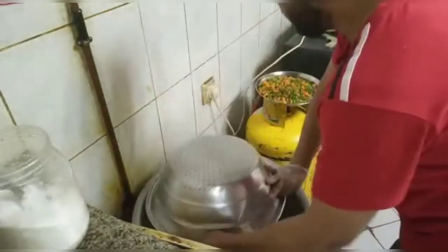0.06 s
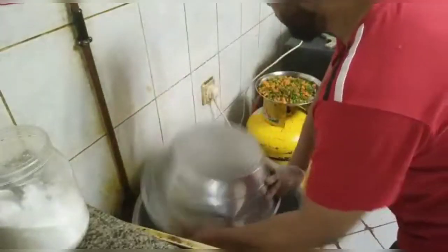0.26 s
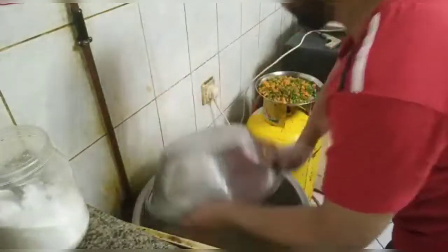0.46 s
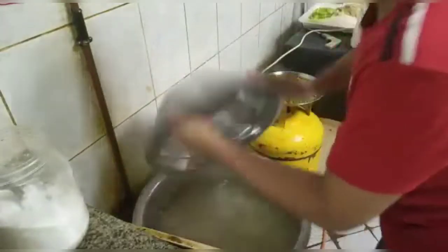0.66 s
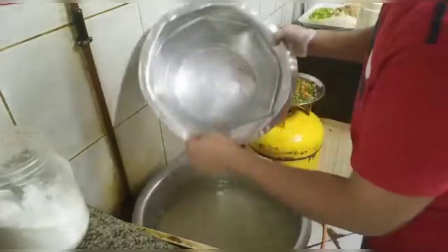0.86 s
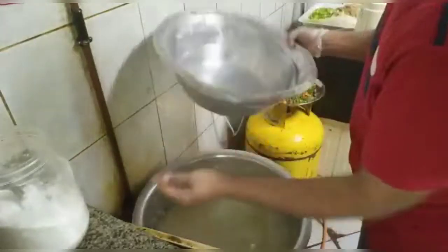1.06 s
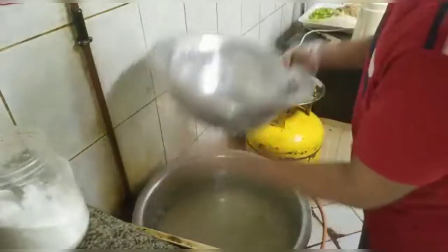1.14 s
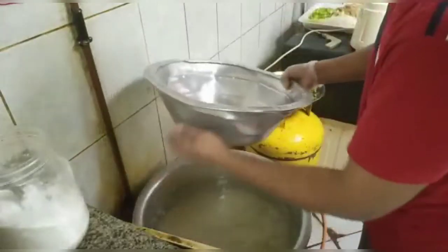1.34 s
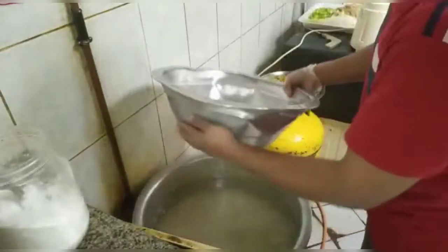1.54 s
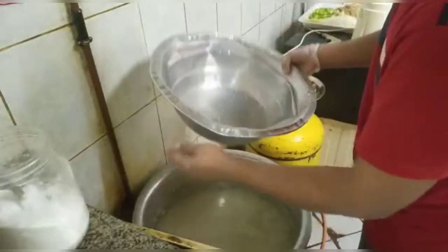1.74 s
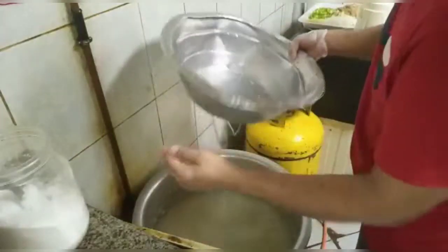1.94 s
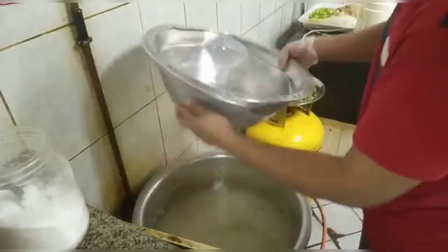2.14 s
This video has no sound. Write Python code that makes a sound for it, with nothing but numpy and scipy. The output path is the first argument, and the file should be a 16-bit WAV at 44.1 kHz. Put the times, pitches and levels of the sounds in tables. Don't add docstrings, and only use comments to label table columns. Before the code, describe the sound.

A thin metal strainer rings out from an earlier blow while grains hiss and fade, with a faint tick near 0.1 s. It clangs on a large pot rim at 0.3 and 0.6 s, then hand slaps ring its side at 1.5 and base at 1.85 s, grains sliding after each. A faint knock follows at 2.05. Low extractor hum and air dip after blows; small tiled kitchen, compressed phone sound.

```python
import sys
import numpy as np
from scipy import signal
from scipy.fft import rfft, irfft
from scipy.io import wavfile
from scipy.ndimage import uniform_filter1d

SR = 44100
rng = np.random.default_rng(int(sys.argv[2]) if len(sys.argv) > 2 else 0)


def dump(signal):
    limited = np.clip(np.atleast_2d(signal).T, -1, 1)
    pcm = np.round(limited * 32767).astype(np.int16)
    wavfile.write(sys.argv[1], SR, pcm)


def voltage_ratio(decibels):
    exponent = np.asarray(decibels, float) / 20
    return 10 ** exponent


N = 99225
TIME = np.arange(N) / SR
BINS_HZ = np.arange(N + 1) * SR / (2 * N)
LEFT_RIGHT = np.array([[1], [-1]])

# (frequency [Hz], level [dB])
MOTOR_LINES = [(96.9, -37), (193.8, -52.5), (290.7, -54.5), (387.6, -56), (1066, -50.5), (1755, -55.5),
               (1922, -63)]
# (frequency [Hz], level [dB per Hz])
AIR_COLOUR = [(25, -23.5), (95, 1), (140, -7), (300, -13.5), (650, -16.5), (1100, -13), (3000, -18),
              (13000, -30)]
# (time [s], level [dB])
BACKGROUND_GAIN = [(0, 13), (.07, 9), (.12, 10.5), (.21, 13.5), (.3, 13), (.55, 3.5), (.85, -2), (.97, 1.5),
                   (1.02, 0), (1.15, 1.5), (1.25, 2.5), (1.36, 2.5), (1.42, 1), (1.5, -0.5), (1.8, 1.5),
                   (2.1, 4.5), (2.19, 7), (2.25, 3.5)]
# (frequency [Hz], likeness [-1 to 1])
EAR_LIKENESS = [(40, 1), (300, 0.76), (600, .3), (1500, -0.23), (6000, -0.092), (13000, 0.14)]

# (start [s], peak [s], fade by 60 dB [s], level [dB])
GRAIN_SLIDES = [
    (-.05, 0.008, 0.6, -27),
    (1.632, 1.767, 0.9, -27.5),
    (1.934, 2.089, 0.25, -27),
]
# (frequency [Hz], level [dB per Hz])
GRAIN_COLOUR = [(500, -45), (1200, -1), (3000, -7), (6500, 2), (9000, -3.5), (13000, 1.5)]

# (time [s], strength [dB], body [0 pot rim, 1 hand on side, 2 hand on base; whole part counts],
# decay scale [times], brightness [dB per octave])
STRIKES = [
    (-.12, -21, 2, 1.75, 0.45),
    (0.2843, -4.5, 0, 0.97, -1.22),
    (0.6134, -5, 0.39, .95, 0.15),
    (1.5327, -3, 1.007, 0.93, -0.028),
    (1.8394, -3.5, 2, 0.9, -0.026),
]
# (time [s], level [dB], which modes [index])
SMALL_KNOCKS = [
    (.077, -36, 0),
    (2.055, -39, 1),
]
# (frequency [Hz], level [dB], decay by 60 dB [s])
KNOCK_MODES = [
    [(615, 8, 0.051), (1760, 5, 0.029), (2650, -5, .04), (3120, 2.5, 0.034), (4950, -6, .03)],
    [(1290, 1.5, 0.41), (2010, 0, 0.26), (580, -10, 0.36)],
]

# (frequency [Hz], level [dB], decay by 60 dB [s])
POT_RIM_MODES = [(78.2, -8, 0.77), (137.7, -15, .25), (160, -17, .25), (211, 3, 0.14), (265.9, 0, 0.19),
                 (277, -3, 0.19), (286, -4, 0.25), (337, -12, 0.15), (446, -21, 0.52), (733, -7, 0.43),
                 (1135, -5, 0.31), (1180.2, -4, 0.3), (1673, -16, 0.22), (1970, -21, 0.76)]
# (frequency [Hz], level [dB], decay by 60 dB [s])
SIDE_SLAP_MODES = [(77.5, -3.5, 0.61), (110.8, -12, 0.35), (269, -14, 0.46), (489.5, -12, 0.23),
                   (600.6, -7, 0.36), (626, -10, 0.45), (963, -12, 0.26), (1106, -6, .24), (1953, -10, 0.4),
                   (2152, -4, .3), (2580, -11, 0.55), (2773, -5, .36), (2950, -5, 0.36), (3270, -3, 0.27)]
# (frequency [Hz], level [dB], decay by 60 dB [s])
BASE_SLAP_MODES = [(78.5, -4, 0.9), (100.2, 1, 0.25), (133.7, -1.5, 0.14), (157, -4, 0.2), (447, -5, 0.5),
                   (511, -8, 0.55), (582, -6, 0.45), (274, -12, 0.35), (857, -8, 0.2), (1226, -6.5, 0.097),
                   (1954, -18, 0.65), (2303, -7.5, 0.2), (2767, -23, 0.15), (6019, -16, .12)]
# (frequency [Hz], level [dB], decay by 60 dB [s])
CONTACT_THUD = [(330, -5, 0.041), (642, -3, .03), (121, -3, 0.05), (80, -9, .12), (185, -3, .06)]

# (frequency [Hz], level [dB per Hz])
POT_RIM_CLANG = [(40, -30), (110, -18), (260, -9), (500, -18), (1170, -13), (1600, -17), (6000, -25),
                 (13000, -32)]
# (frequency [Hz], level [dB per Hz])
SIDE_SLAP_CLANG = [(40, -17), (90, -10), (200, -19), (600, -7), (1300, -8), (2800, -4), (4200, -16),
                   (13000, -22)]
# (frequency [Hz], level [dB per Hz])
BASE_SLAP_CLANG = [(40, -25), (140, -8), (280, -12), (520, -5), (1200, -8), (3500, -11.5), (6200, -11.5),
                   (13000, -21.5)]
# (frequency [Hz], decay by 60 dB [s])
CLANG_DECAY = [(100, 0.44), (400, 0.52), (1500, 0.54), (4000, 0.46), (8000, 0.46), (13000, 0.39)]
# (frequency [Hz], width [Hz], level [dB])
MODE_CROWDS = [(505, 30, 4), (615, 35, 5), (735, 25, 4), (860, 20, 5), (1110, 30, 5), (1180, 50, 5),
               (1670, 40, 5), (1980, 25, 7), (2150, 40, 6), (2320, 60, 5), (2580, 40, 4), (2760, 40, 5),
               (2940, 25, 5), (3190, 30, 6)]
# (frequency [Hz], width [Hz], level [dB])
MODE_GAPS = [(400, 20, -3), (545, 20, -4), (680, 25, -8), (920, 30, -3), (1020, 30, -5), (1520, 90, -7),
             (1770, 40, -6), (2480, 40, -4), (3400, 80, -8), (4000, 60, -4)]

# (frequency [Hz], level [dB], decay by 60 dB [s])
RIM_PARTIALS_1 = [(630, -5, 0.45), (791, -2, 0.41), (1130, 0, 0.41), (1986, -44, 5.0), (2708, -12, 0.61),
                  (3628, -16, 0.53), (4086, -22, 1.7), (4608, -15, 0.38), (5033, -18, 0.37),
                  (5679, -16, 0.46)]
# (frequency [Hz], level [dB], decay by 60 dB [s])
RIM_PARTIALS_2 = [(727, 0, 0.17), (1184, -8, 0.28), (1620, -15, 0.56), (2116, -18, 1.0), (4000, -24, 0.77),
                  (4721, -14, 0.25), (4931, -17, 0.37), (5206, -10, 0.18), (5539, -29, 1.3),
                  (5852, -26, 5.0)]
# (frequency [Hz], level [dB], decay by 60 dB [s])
SIDE_PARTIALS = [(1109, 0, 0.19), (1981, -5, 0.22), (2557, -13, 0.21), (2762, -13, 0.85), (2939, -19, 5.0),
                 (3182, -10, 0.36), (3688, -25, 1.1), (3941, -14, 0.25), (4570, -19, 0.3),
                 (6277, -20, 0.37)]
# (frequency [Hz], level [dB], decay by 60 dB [s])
BASE_PARTIALS = [(856, -5, 0.44), (1190, 0, 0.19), (1976, -7, 0.36), (2309, -5, 0.3), (3521, -6, 0.12),
                 (4215, -9, 0.19), (4592, -22, 1.5), (4915, -18, 0.6), (5766, -25, 2.7), (6019, -5, 0.15)]

BODY_MODES_DB = [-9.5, -10, -9]
BODY_THUD_DB = [-4, -9, -9]
BODY_CLANG_DB = [-2, -2, -2.5]
BODY_CRACK_DB = [7, 5, 5]
BODY_SWELL_S = [0.036, 0.0064, 0.0039]
BODY_HOLD_S = [0.06, 0.016, 0.013]
BODY_CLANG_HOLD_S = [0.033, 0.011, 0.0069]
BLOW_PARTIALS_DB = [-23, -19, -19, -21]
BLOW_TOP_OPEN_S = [0, .009, .032, .04, .022]


def rms_one(x):
    return x / np.sqrt(np.mean(x ** 2) + 1e-20)


def at_hz(points, hz):
    table = np.array(points)
    return np.interp(np.log(hz), np.log(table[:, 0]), table[:, 1])


def drift(rate_hz):
    r = np.exp(-80 * np.pi * rate_hz / SR)
    slow = signal.lfilter([1], [1, -2 * r, r * r], rng.standard_normal(N // 40 + 2002))[2000:]
    return np.interp(np.arange(N) / 40, np.arange(len(slow)), rms_one(slow))


def filtered(x, gain):
    return irfft(rfft(x, 2 * N) * gain)[..., :N]


def noise_bands():
    edges = 22.5 * 2 ** np.arange(0, 9.4, 1 / 3)
    white = rng.standard_normal((2, 2, N))
    out = []
    for k, (low, high) in enumerate(zip(edges, edges[1:])):
        hz = np.sqrt(low * high)
        band = signal.butter(2, [low, high], "band", fs=SR, output="sos")
        mid, side = signal.sosfilt(band, white[k % 2])
        alike = np.clip(at_hz(EAR_LIKENESS, hz), -1, 1)
        out.append((hz, np.sqrt(1 + alike) * mid + np.sqrt(1 - alike) * side * LEFT_RIGHT))
    return out


def even_gain(noise, colour):
    return 1 / np.sqrt(sum(voltage_ratio(2 * at_hz(colour, hz)) * np.mean(x ** 2) for hz, x in noise))


def coloured(noise, colour, drift_hz):
    total = sum(voltage_ratio(at_hz(colour, hz) + 2.2 * drift(drift_hz)) * x for hz, x in noise)
    return even_gain(noise, colour) * total


def motor(noise):
    waver_db, waver_hz = 1.5, 8
    shared = drift(waver_hz)
    lines = 0
    for hz, db in MOTOR_LINES:
        own_dips = (1.8 + hz / 900) * np.abs(drift(waver_hz))
        ear_db = 0.4 * LEFT_RIGHT * (hz < 150)
        level_db = db + 2 + waver_db * (0.91 * shared + 1.1 - own_dips) + ear_db
        phase = 0.5 * drift(9) + rng.uniform(0, 5.65) + min(hz / 1400, 0.8) * LEFT_RIGHT
        lines = lines + voltage_ratio(level_db) * np.sin(2 * np.pi * hz * TIME + phase)
    air = voltage_ratio(-46.5) * coloured(noise, AIR_COLOUR, 7)
    return voltage_ratio(np.interp(TIME, *np.transpose(BACKGROUND_GAIN))) * (lines + air)


def sliding_grains(noise):
    shape = 0
    for start, peak, fade_s, db in GRAIN_SLIDES:
        fade_db = -60 * np.maximum(TIME - peak, 0) / fade_s
        shape = shape + voltage_ratio(db + fade_db) * np.interp(TIME, [start, peak], [0, 1])
    return shape * voltage_ratio(1.5 * drift(30)) * coloured(noise, GRAIN_COLOUR, 15)


def crowded_modes(noise):
    mode_width_hz, random_db, random_from_hz = 13, 4, 3400
    size = max(int(mode_width_hz * N / SR), 1)
    hz = np.arange(N // 2 + 1) * SR / N
    fine = rng.standard_normal(N // 2 + 1)
    for _ in range(2):
        fine = uniform_filter1d(fine, size=size)
    comb_db = random_db * rms_one(fine) * (hz > random_from_hz)
    for center, width, db in MODE_CROWDS + MODE_GAPS:
        comb_db = comb_db + db / (1 + (2 * (hz - center) / width) ** 2)
    return [(band_hz, irfft(rfft(x) * voltage_ratio(comb_db), N)) for band_hz, x in noise]


def clang(noise):
    crack_s, rise_s, flicker_db = 0.003, 0.00083, 1.5
    touch_s, touch_db = 0.0025, -23
    colours = [POT_RIM_CLANG, SIDE_SLAP_CLANG, BASE_SLAP_CLANG]
    gains = [even_gain(noise, c) for c in colours]
    out = 0
    for hz, x in noise:
        shape = 0
        for s, db, body, stretch, tilt_db in STRIKES:
            k = int(body)
            age = np.maximum(TIME - s, 0)
            crack = 1 + voltage_ratio(BODY_CRACK_DB[k]) * np.exp(-age / crack_s) * (hz / 6000) ** 1.2
            bright_db = tilt_db * np.log2(max(hz / 1000, 1))
            gain = gains[k] * voltage_ratio(db + BODY_CLANG_DB[k] + at_hz(colours[k], hz) + bright_db)
            rise = np.minimum(age / rise_s, 1) + voltage_ratio(touch_db) * (TIME > s - touch_s)
            fade_s = stretch * at_hz(CLANG_DECAY, hz)
            fade = voltage_ratio(-60 * np.maximum(age - BODY_CLANG_HOLD_S[k], 0) / fade_s)
            shape = shape + gain * fade * crack * rise
        out = out + shape * voltage_ratio(flicker_db * drift(31.6)) * x
    return out


def upper_partials():
    swell_s, ear_spread, longest_s = 0.004, 1.6, 0.5
    tables = [RIM_PARTIALS_1, RIM_PARTIALS_2, SIDE_PARTIALS, BASE_PARTIALS]
    out = np.zeros((2, N))
    for (s, *_), blow_db, modes in zip(STRIKES[1:], BLOW_PARTIALS_DB, tables):
        age = np.maximum(TIME - s, 0)
        top_db = max(m[1] for m in modes)
        swell = 1 - np.exp(-age / swell_s)
        for (hz, db, t60), turn in zip(modes, rng.standard_normal((len(modes), 2, 1))):
            fade = voltage_ratio(blow_db + db - top_db - 60 * age / min(t60, longest_s))
            out += fade * swell * np.sin(2 * np.pi * hz * age + ear_spread * turn)
    return out


def rings(s, modes, stretch, swell_s, hold_s):
    age = np.maximum(TIME - s, 0)
    out = 0
    for (hz, db, t60), (louder, sharper) in zip(modes, rng.standard_normal((len(modes), 2))):
        slow = np.clip(300 / hz, 0.35, 1)
        tone = voltage_ratio(db + 1.2 * louder) * np.sin(2 * np.pi * hz * age * (1 + 0.003 * sharper))
        fade = voltage_ratio(-60 * np.maximum(age - hold_s * slow, 0) / (t60 * stretch))
        out = out + tone * fade * (1 - np.exp(-age / (swell_s * slow)))
    return out


def struck_strainer():
    bodies = [POT_RIM_MODES, SIDE_SLAP_MODES, BASE_SLAP_MODES]
    out = 0
    for s, db, body, stretch, _ in STRIKES:
        k = int(body)
        ring = rings(s, bodies[k], stretch, BODY_SWELL_S[k], BODY_HOLD_S[k])
        thud = rings(s, CONTACT_THUD, 1, 0.00092, 0.0032)
        out = out + voltage_ratio(db + BODY_MODES_DB[k]) * ring + voltage_ratio(db + BODY_THUD_DB[k]) * thud
    for s, db, k in SMALL_KNOCKS:
        out = out + voltage_ratio(db) * rings(s, KNOCK_MODES[int(k)], 0.79, 0.0065, 0.011)
    return out


def kitchen(x):
    room_t60_s, wall_cut_hz, wall_low_hz = 0.26, 5700, 188
    out, spec = np.zeros((2, N)), rfft(x, 2 * N)
    w = 2 * np.pi * np.arange(len(spec)) / (2 * N)
    dull = 1 / (1 + 1j * w * SR / (2 * np.pi * wall_cut_hz))
    low_cut = 1 + (2 * np.pi * wall_low_hz / SR / (w + 1e-9)) ** 4
    for k, lag in enumerate(rng.uniform(0.012, 0.04, 16) * SR):
        loop = voltage_ratio(-60 * lag / SR / room_t60_s) * dull * np.exp(-1j * w * lag)
        echoes = irfft(spec / low_cut * loop / (1 - loop))[:N]
        out[k % 2] += echoes * (-1) ** (k // 2) / 3
    return out


def scene():
    near, noise = struck_strainer(), noise_bands()
    later = [(hz, np.roll(x, SR // 3, axis=1)) for hz, x in noise]
    side_lag = 0.003 * SR
    side = voltage_ratio(-14) * np.interp(np.arange(N) - side_lag, np.arange(N), near) * LEFT_RIGHT
    strainer = near + side + voltage_ratio(-10) * kitchen(near) * voltage_ratio(6.5) + clang(crowded_modes(noise))
    return strainer + sliding_grains(later) + motor(later) + upper_partials()


def microphone(x):
    shelf = voltage_ratio(-10.5 * (0.5 + 0.5 * np.tanh((BINS_HZ - 7190) / 140)))
    return filtered(x, shelf / (1 + (26 / (BINS_HZ + 1)) ** 4))


def hush_before_blows(x):
    ahead = sum((TIME > s - 0.016) & (TIME < s - 0.0035) for s, *_ in STRIKES)
    treble = filtered(x, 1 / (1 + (3500 / (BINS_HZ + 1)) ** 4))
    return x + (voltage_ratio(-12 * uniform_filter1d(1. * ahead, size=60)) - 1) * treble


def limiter(x):
    limit_db, release_db_per_s, attack_s = 4, 243, 0.003
    over = np.maximum(20 * np.log10(np.abs(x).max(axis=0) + 1e-9) - limit_db, 0)
    release = release_db_per_s * TIME
    held = np.maximum.accumulate(over + release) - release
    r = np.exp(-1 / (attack_s * SR))
    return np.clip(x * voltage_ratio(-signal.lfilter([1 - r], [1, -r], held)), -1, 1)


def cut_top(x):
    top = filtered(x, 0.5 + 0.5 * np.tanh((BINS_HZ - 12900) / 90))
    opened = sum((TIME > s) & (TIME < s + d) for (s, *_), d in zip(STRIKES, BLOW_TOP_OPEN_S))
    return x - top * (1 - voltage_ratio(-17) * uniform_filter1d(1. * opened, size=90))


def roll_off(x):
    return signal.sosfilt(signal.butter(12, 15800, fs=SR, output="sos"), x)


def record(dry):
    heard = hush_before_blows(microphone(dry))
    mix = cut_top(limiter(heard))
    return roll_off(mix)


dry = scene()
out = record(dry)
dump(out)
```